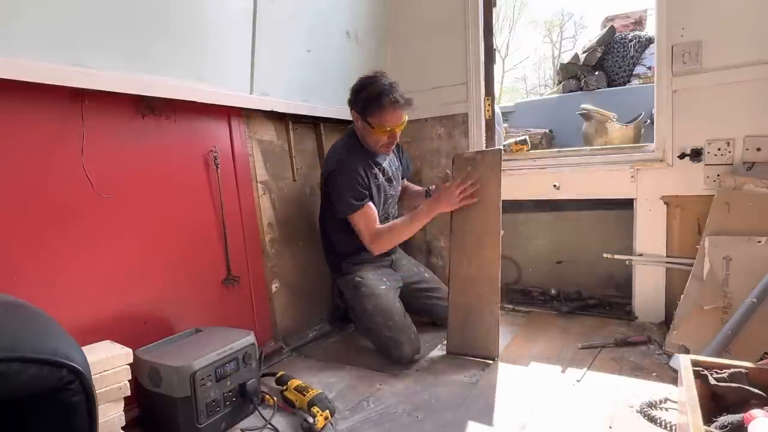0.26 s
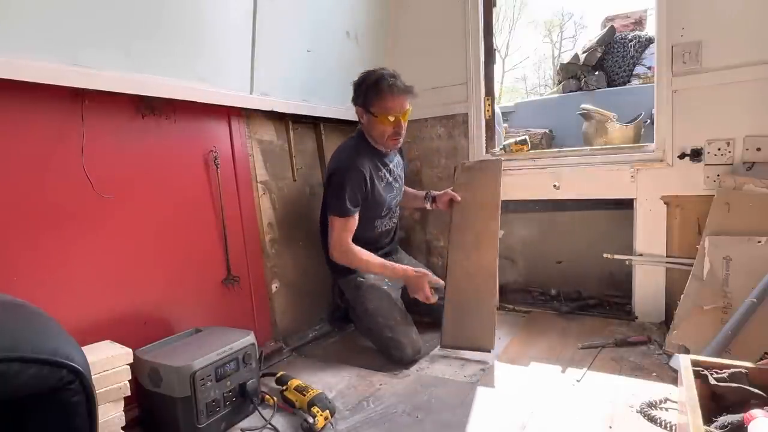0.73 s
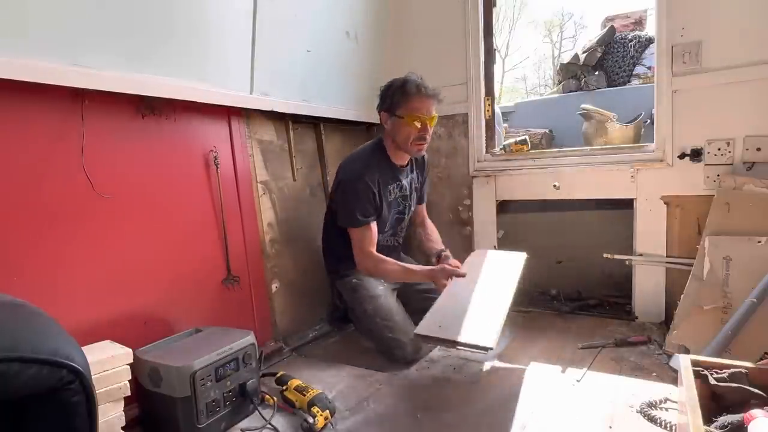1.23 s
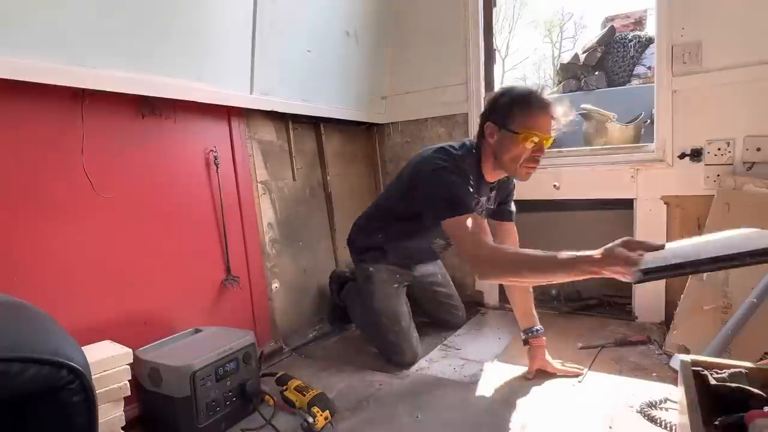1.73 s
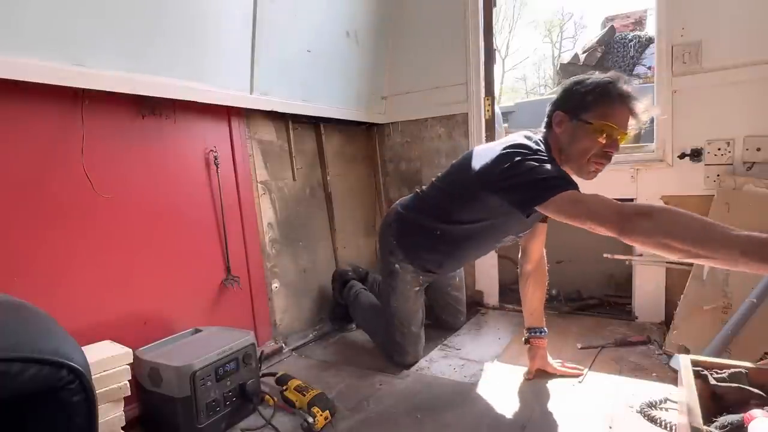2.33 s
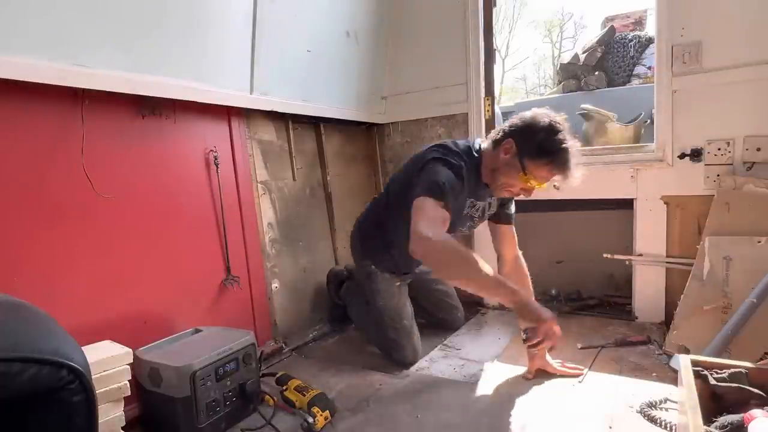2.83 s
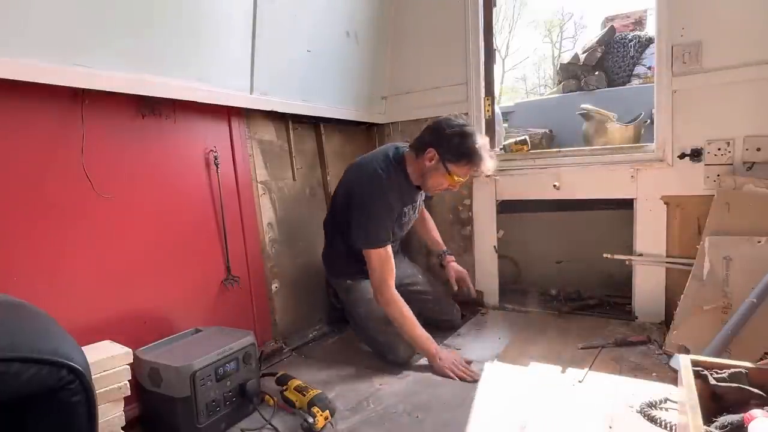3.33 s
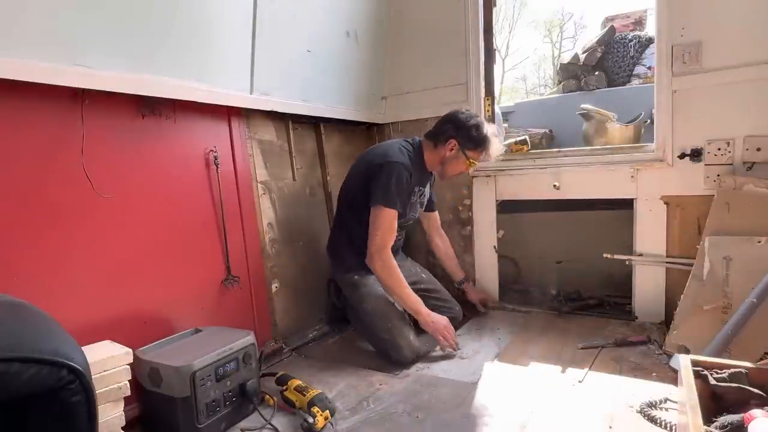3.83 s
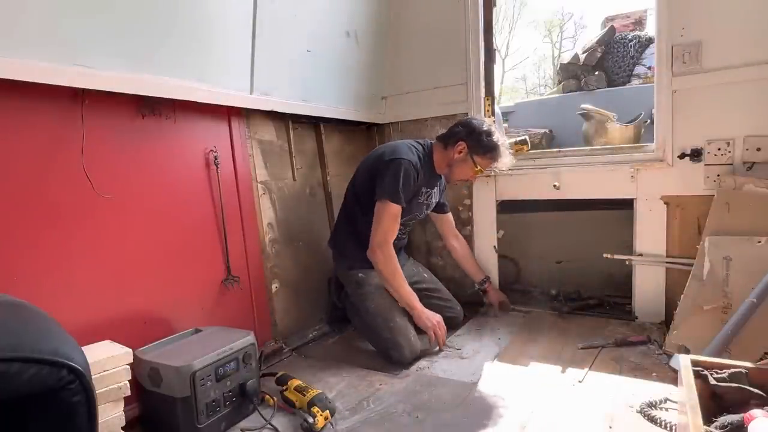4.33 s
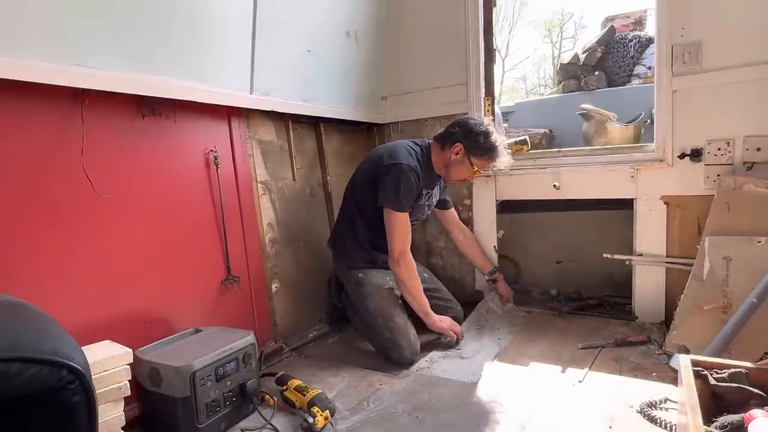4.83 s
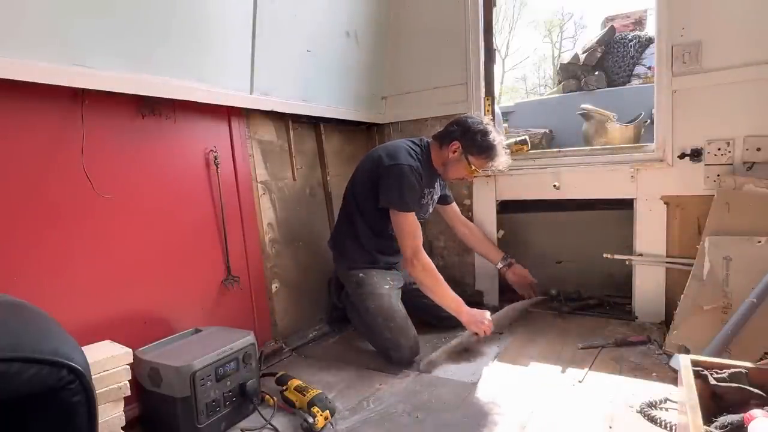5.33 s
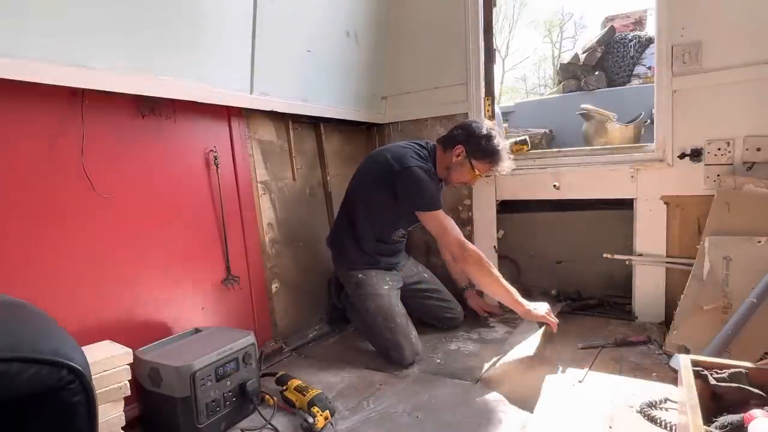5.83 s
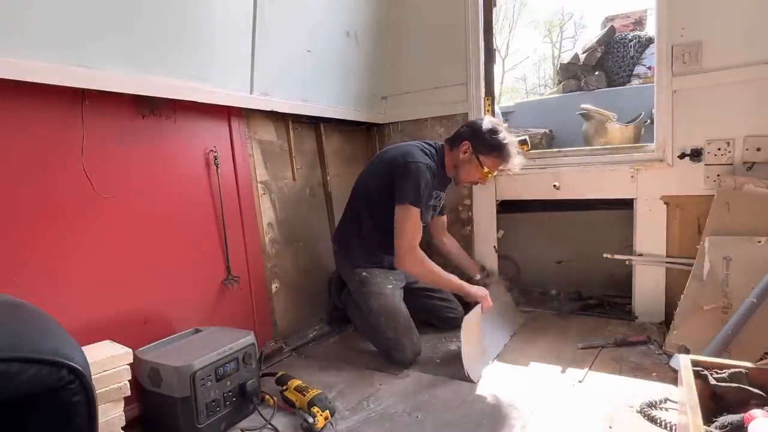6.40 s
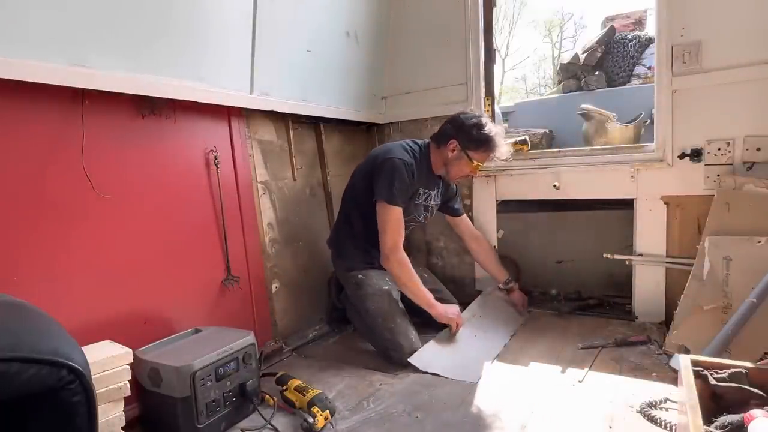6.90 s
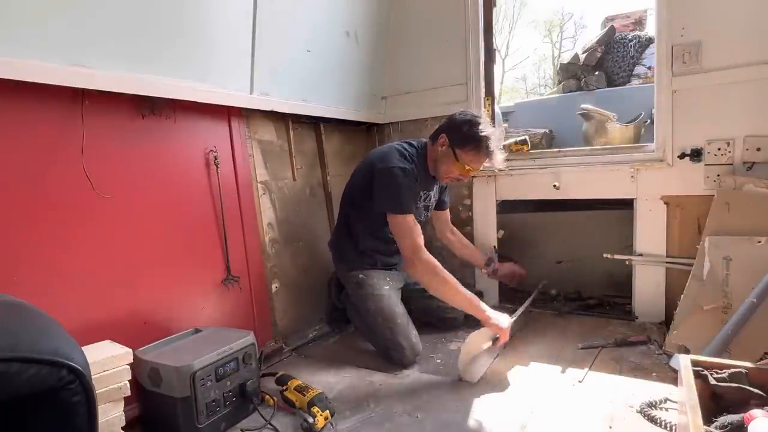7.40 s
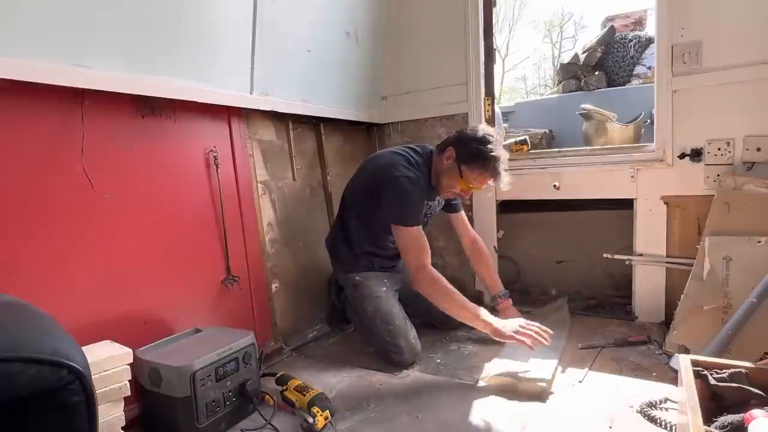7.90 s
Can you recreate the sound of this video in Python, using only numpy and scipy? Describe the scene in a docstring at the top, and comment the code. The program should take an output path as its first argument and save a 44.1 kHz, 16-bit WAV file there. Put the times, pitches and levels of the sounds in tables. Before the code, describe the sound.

Hollow floor thuds, dense wooden clacks and a dusty palm swish, followed by crackling snaps, hoarse scraping and hollow gliding notes from a flexing sheet.

```python
"""A wooden floorboard is lifted, thuds on end and clatters onto a stack in a small boat cabin: each blow
is a click with a dense wood spectrum, plus the board's dying tones and a boom of the hollow floor.
A man's palm sweeps dust, his hands rustle and the board scrapes (shaped noise); then a thin stiff sheet
is peeled up, flipped and dragged over grit: snaps, gliding hollow notes, scraping and hiss.
A low hum goes on, with a boom swelling in it near 6.5 s."""
import sys
import numpy as np
from scipy import signal
from scipy.fft import rfft, irfft
from scipy.io import wavfile

SR = 44100
rng = np.random.default_rng(int(sys.argv[2]) if len(sys.argv) > 2 else 0)


def unload_audio(sound):
    """Save the sound as a 16-bit wav file, at the path given as the first command line argument."""
    columns = np.transpose(np.atleast_2d(sound))
    # keep every value between -1 and 1, then stretch to whole-number steps
    steps = np.round(np.clip(columns, -1, 1) * 32767)
    wavfile.write(sys.argv[1], SR, steps.astype(np.int16))


N = 359415
TIME, HZ = np.arange(N) / SR, np.fft.rfftfreq(N, 1 / SR)
# time and frequency axes of one short blow
RING = np.arange(20480) / SR
RING_HZ = np.fft.rfftfreq(len(RING), 1 / SR)

# how strongly the thin sheet sounds at each pitch: (frequency [Hz], density [dB per Hz])
SHEET_SPECTRUM = [(120, -25), (210, -11.5), (445, -4.5), (513, -7), (802, -1), (1370, 1), (1610, 0),
                  (2560, -3.5), (3120, -6.5), (9260, -16), (10100, -19.5), (13700, -18.5), (15000, -64)]


def gain_of(db):
    """Turns decibels into an amplitude."""
    return 10 ** (np.asarray(db) / 20)


def evened(x):
    """Scales a signal to an rms of one."""
    return x / np.sqrt(np.mean(x ** 2) + 1e-20)


def read(points, hz):
    """Reads a table joined by straight lines over log frequency."""
    f, value = np.transpose(points)
    return np.interp(np.log(hz + 1), np.log(f + 1), value)


def add(mix, s, sound):
    """Mixes a sound in at time s, cutting it at the end of the mix."""
    part = mix[..., max(round(s * SR), 0):][..., :sound.shape[-1]]
    part += sound[..., :part.shape[-1]]


def coloured(x, db):
    """Gives a full-length signal a spectrum and an rms of one."""
    return evened(irfft(rfft(x) * gain_of(db), N))


def tilted(points, tilt_db, pivot_hz):
    """Leans a spectrum by some dB per octave: harder contacts are brighter."""
    octaves = np.log2(np.maximum(RING_HZ, 150) / pivot_hz)
    return read(points, RING_HZ) + tilt_db * octaves


def click(db):
    """Makes a causal click with the given spectrum, its energy that of 50 ms at rms one."""
    log_gain = np.log(gain_of(np.maximum(db - db.max(), -100)))
    circle = np.concatenate([log_gain, log_gain[-2:0:-1]])
    # the Hilbert transform supplies the phase that puts the energy as early as possible
    spectrum = np.exp(np.conj(signal.hilbert(circle)))[:len(db)]
    pulse = irfft(spectrum)
    return pulse / np.linalg.norm(pulse) * np.sqrt(SR / 20)


def dispersed(pulse, dispersion):
    """Bending waves run faster in the treble, so a blow falls in pitch: delay = dispersion / sqrt(Hz)."""
    return irfft(rfft(pulse) * np.exp(-4j * np.pi * dispersion * np.sqrt(RING_HZ)))


def modes(hz, db, t60, rise):
    """Dying sines that build up as the blow spreads; each reaches the far side with its own phase."""
    levels = gain_of(db[:, None] - 60 * RING / t60[:, None])
    waves = levels * np.exp(2j * np.pi * hz[:, None] * RING)
    index = np.arange(len(hz))
    signs = np.array([(-1.) ** index, (-1.) ** (index // 2)])
    build_up = 1 - np.exp(-RING / rise)
    return np.array([signs[0] @ waves.imag, signs[1] @ waves.real]) * build_up


def in_cabin(pulse, direct_db, build):
    """Rows: the direct sound and two diffuse tails that build up between the close walls."""
    # how long the cabin rings: (frequency [Hz], time to fall by 60 dB [s])
    cabin_decay = [(80, 0.86), (250, 0.2), (1000, 0.34), (3000, 0.22), (8000, 0.29), (15000, .22)]
    hz, t, z = signal.stft(rng.standard_normal((2, len(RING))), SR, nperseg=256)
    decay = gain_of(-60 * t / read(cabin_decay, hz)[:, None])
    tail = signal.istft(z * decay, SR, nperseg=256)[1][:, :len(RING)]
    tail = tail * (1 - np.exp(-RING / build))
    tail = signal.fftconvolve(tail, pulse[None], axes=1)[:, :len(RING)]
    # each tail carries the energy of the pulse
    tail *= np.linalg.norm(pulse) / np.linalg.norm(tail, axis=1, keepdims=True)
    return np.vstack([gain_of(direct_db) * pulse, tail])


def friction(grains_per_s, spread_db, grain_db, judder_db):
    """Fine rubbing noise with separate grains catching in it, under an unsteady pressure."""
    sizes = gain_of(spread_db * np.minimum(rng.exponential(1, N), 4))
    grains = evened(sizes * (rng.random(N) < grains_per_s / SR))
    echoes = rng.standard_normal((2, len(RING))) * np.exp(-RING / 0.038)
    echoes[:, 0] = 6  # each grain is heard first directly, then off the walls
    grains = evened(signal.fftconvolve(grains[None], echoes, axes=1)[:, :N])
    slow_db = -20 * np.log10(1 + (HZ / 45) ** 2) - 20 * (HZ < 10)
    pressure = coloured(rng.standard_normal(N), slow_db)
    rubbing = rng.standard_normal((2, N)) + gain_of(grain_db) * grains
    return rubbing * gain_of(judder_db * pressure)


def gesture(start, attack, hold, sag_db, release_db_per_s):
    """The gain of one rubbing move: it rises, loses sag_db while held (gains if negative), then dies away."""
    t = TIME - start
    held = np.clip((t - attack) / hold, 0, 1)
    released = np.maximum(t - attack - hold, 0)
    rise = np.clip(t / attack, 0, 1) ** 0.91
    return rise * gain_of(sag_db * (.5 - held) - release_db_per_s * released)


def off_panels(x, strength, reach, count=10):
    """Early echoes from the nearby panels comb a fine ripple into the rubbing."""
    delays = rng.uniform(.001, reach, count)  # s
    sizes = strength * rng.choice([-1., 1.], count) / np.sqrt(count)
    taps = np.zeros(len(RING))
    taps[0] = 1
    taps[(delays * SR).astype(int)] = sizes
    return signal.oaconvolve(x, taps[None] / np.linalg.norm(taps), axes=1)[:, :N]


def boom(soft_hz):
    """The hollow floor's tones; a soft push reaches only the lowest."""
    # the floor's modes: (frequency [Hz], level before the push softens it [dB], time to fall by 60 dB [s])
    floor_modes = [(45.3, -16, 0.19), (54.6, -14, 0.71), (93.47, 0, 0.42), (116.4, -0.5, 0.18),
                   (142, -16, 0.43), (161.5, -6, 0.23), (336, -17, 0.216)]
    push = signal.butter(2, min(soft_hz, SR / 4), fs=SR)
    return signal.lfilter(*push, modes(*np.transpose(floor_modes), rise=0.0057))


def wood(edge):
    """The clack's spectrum between a flat landing (0) and one on the edge (1)."""
    # dense upper modes of wood on wood:
    # (frequency [Hz], struck on the face [dB per Hz], struck on the edge [dB per Hz])
    clack_spectra = [(50, -34.5, -19), (148, -2, 1.5), (292, 0.5, 3.5), (450, -4, -3.5), (800, -6.5, -1),
                     (980, -14.5, -1.5), (1500, -11, -11.5), (1860, -13, -16), (2170, -18.5, -26),
                     (2900, -18.5, -15), (3920, -30, -21), (4950, -32, -29.5), (8800, -47.5, -42.5),
                     (15500, -71, -63)]
    hz, face_db, edge_db = np.transpose(clack_spectra)
    return np.column_stack([hz, face_db + np.clip(edge, 0, 1) * (edge_db - face_db)])


def background(waver_hz=.6, hum_db=-1):
    """Rumble and faint outdoor hiss as shaped noise, with a low sine hum whose pitch climbs and wavers."""
    # loudness of the low hum, with a boom swelling in it near 6.5 s; hum_db is added to it:
    # (time [s], rms level [dB])
    hum_levels = [(2.8, -57), (4.26, -55), (4.3, -51.5), (6.44, -58), (6.54, -42.5), (7.36, -53.5),
                  (7.67, -48), (8.15, -53)]
    # rumble and hiss: (frequency [Hz], density [dB per Hz])
    air_spectrum = [(15, -69), (25, -10), (101, -3), (158, -20), (243, -20), (293, -18), (501, -22.5),
                    (637, -20.5), (978, -16.5), (1180, -19.5), (1280, -20), (2560, -34.5), (11500, -43),
                    (13800, -46), (15000, -72)]
    air_db = -54.5
    # the hum, perhaps a distant engine, slowly climbs and levels off
    first_hz, last_hz, climb_at_s, climb_hz_per_s = 48.8, 61, 3.6, 3.4
    s, db = np.transpose(hum_levels)
    hz = np.clip(first_hz + climb_hz_per_s * (TIME - climb_at_s), first_hz, last_hz)
    drift = coloured(rng.standard_normal(N), -40 * np.log10(1 + (HZ / 2) ** 2))
    phase = 2 * np.pi * np.cumsum(hz + waver_hz * drift) / SR
    hum = gain_of(hum_db + np.interp(TIME, s, db)) * np.sqrt(2) * np.sin(phase)
    air = gain_of(air_db) * coloured(rng.standard_normal((2, N)), read(air_spectrum, HZ))
    return np.vstack([hum, air])


def handling():
    """Fingers shift, clothes rustle and the board scrapes along the stack: grainy noise in short moves."""
    # each rub, before the common trim: (start [s], attack [s], hold [s], level [dB])
    rubs = [(0.0, 0.0017, 0.016, -42), (0.081, .015, 0.017, -49.5), (0.232, 0.018, .015, -56.5),
            (0.327, .025, .04, -55.5), (0.6, 0.054, .03, -60), (0.78, 0.017, 0.025, -63.5),
            (1.137, 0.072, 0.0059, -47.5), (1.48, 0.044, .06, -67.5), (1.59, 0.024, 0.098, -56.5),
            (1.95, 0.034, 0.037, -64.5), (2.07, .01, 0.23, -56.5), (2.251, 0.017, 0.31, -50),
            (2.408, 0.023, 0.024, -52), (2.713, 0.094, .24, -58)]
    # colour of the rubbing: (frequency [Hz], density [dB per Hz])
    grip_spectrum = [(290, -23), (500, -21), (777, -7), (909, -3.5), (1020, 1.5), (1230, -6.5), (2880, -9),
                     (8490, -17), (13800, -26.5), (15000, -52)]
    sag_db, release_db_per_s, trim_db = 2.5, 118, 3.0
    rub = friction(grains_per_s=200, spread_db=6.5, grain_db=-13, judder_db=1.5)
    moves = sum(gain_of(db) * gesture(s, attack, hold, sag_db, release_db_per_s)
                for s, attack, hold, db in rubs)
    return gain_of(trim_db) * moves * coloured(rub, read(grip_spectrum, HZ))


def sweep(start, to_peak, width):
    """The gain of one palm stroke: the hand touches down and its speed follows a bell."""
    touch_s, speed_power = 0.0038, 1.82  # the swish grows as this power of the hand's speed
    t = TIME - start
    speed = 1 / (1 + ((t - to_peak) / width) ** 2)
    return np.clip(t / touch_s, 0, 1) * speed ** speed_power


def palm_strokes():
    """Skin sweeps fine dust along the wood: dense tiny grains make a smooth bright swish."""
    # each stroke, before the common trim:
    # (touch-down [s], time to full speed [s], half-width of the speed bell [s], level [dB])
    palm_sweeps = [(0.386, 0.12, .088, -36), (3.292, .19, 0.086, -26.5)]
    # colour of the swish: (frequency [Hz], density [dB per Hz])
    palm_spectrum = [(180, -37), (300, -22), (577, -16), (647, -14.5), (2360, -3.5), (8320, -1),
                     (9960, -12), (10800, -6), (13600, -8.5), (14300, -30), (15000, -56)]
    trim_db = 2.5
    rub = friction(grains_per_s=1000, spread_db=3, grain_db=-18, judder_db=.5)
    strokes = sum(gain_of(db) * sweep(s, to_peak, width) for s, to_peak, width, db in palm_sweeps)
    return gain_of(trim_db) * strokes * coloured(rub, read(palm_spectrum, HZ))


def resonate(x, hz, width):
    """A resonance of gain one that follows the curve hz."""
    # shift the moving pitch down to zero, smooth there, and shift back
    turn = np.exp(2j * np.pi * np.cumsum(hz) / SR)
    r = np.exp(-np.pi * width / SR)
    return 2 * (turn * signal.lfilter([1 - r], [1, -r], x / turn)).real


def sheet_bends(width_hz=290, upper=1.414, upper_db=-4):
    """Rubbing excites two resonances of the bowed sheet, which slide as its curve changes."""
    # each hollow note, before the common trim:
    # (start [s], attack [s], hold [s], level [dB], first pitch [Hz], last pitch [Hz])
    bends = [(4.264, .02, 0.026, -51, 450, 200), (4.363, 0.018, 0.03, -56, 330, 330),
             (4.928, .08, 0.23, -46.5, 654, 610), (5.359, 0.016, 0.27, -45, 1280, 1050),
             (5.732, 0.033, 0.074, -36.5, 1210, 1220), (6.695, 0.31, .17, -47.5, 650, 810),
             (7.192, 0.016, 0.071, -46.5, 730, 573)]
    sag_db, release_db_per_s, trim_db = -2.5, 200, 1.5
    rub = friction(grains_per_s=120, spread_db=6.0, grain_db=0.0, judder_db=2.5)
    note, bowing = np.zeros(N), np.zeros(N)
    for s, attack, hold, db, first_hz, last_hz in bends:
        progress = np.clip((TIME - s) / (attack + hold), 0, 1)
        glide = first_hz * (last_hz / first_hz) ** progress
        note = np.where((TIME >= s) | (note == 0), glide, note)
        bowing += gain_of(db) * gesture(s, attack, hold, sag_db, release_db_per_s)
    # two passes make each resonance steeper
    low, high = (evened(resonate(resonate(rub, f, width_hz), f, width_hz))
                 for f in (note, upper * note))
    return gain_of(trim_db) * bowing * (low + gain_of(upper_db) * high)


def sheet_slide(drum_hz=800, grit_hz=3500):
    """The dragged edge scrapes; the sheet drums lower down and shakes the floor; loose grit hisses above."""
    # each pull, before the trims:
    # (start [s], attack [s], hold [s], scrape [dB], drumming of the sheet [dB], hiss of grit [dB])
    drags = [(3.952, .11, 0.19, -52, -54, -49), (4.321, 0.042, 0.31, -54, -67, -52.5),
             (4.66, 0.023, 0.032, -49, -57, -47), (4.757, .1, 0.022, -50, -51.5, -48),
             (4.942, .06, 0.12, -45.5, -49, -48.5), (5.102, 0.056, 0.13, -45, -45, -49.5),
             (5.326, 0.028, .02, -51, -53, -51.5), (5.384, .008, 0.036, -32.5, -32.5, -35.5),
             (5.43, .11, 0.21, -31, -37.5, -33), (5.731, .025, 0.043, -30, -43, -37.5),
             (5.926, 0.35, .06, -54, -63, -52.5), (6.309, 0.038, 0.32, -49, -48, -50.5),
             (6.684, 0.35, .27, -40.5, -47, -44.5), (7.328, .03, .17, -56.5, -61.5, -52),
             (7.527, 0.015, 0.021, -41.5, -48, -46), (7.634, 0.11, .03, -48.5, -57, -52.5),
             (7.752, 0.056, 0.047, -39, -50.5, -41), (7.904, 0.046, 0.027, -55, -68.5, -54),
             (8.04, .09, 0.032, -48.5, -61, -46.5)]
    sag_db, release_db_per_s = 0, 156
    trims_db = [-2, -2, -.5]  # scrape, drumming, hiss
    # the hardest pull shakes the hollow floor, light ones hardly do
    boom_db, boom_soft_hz, boom_power = -35.5, 170, 1.16

    rub = friction(grains_per_s=200, spread_db=4, grain_db=-3, judder_db=1.0)
    drums = 1 / (1 + (HZ / drum_hz) ** 4)
    hisses = 1 - 1 / (1 + (HZ / grit_hz) ** 4)
    shares = (1 - drums) * (1 - hisses), drums, hisses
    pulls = np.array([gesture(*row[:3], sag_db, release_db_per_s) for row in drags])
    # overlapping pulls add by power
    gains = np.sqrt(gain_of(np.array(drags)[:, 3:].T) ** 2 @ pulls ** 2)
    shake = evened(signal.oaconvolve(rub, boom(boom_soft_hz), axes=1)[:, :N])
    force = gains[1] / gains[1].max()
    out = gain_of(boom_db) * force ** boom_power * shake
    for trim_db, gain, share in zip(trims_db, gains, shares):
        band_db = read(SHEET_SPECTRUM, HZ) + 20 * np.log10(share + 1e-9)
        out = out + gain_of(trim_db) * gain * coloured(rub, band_db)
    return out


def sheet_snaps():
    """The thin sheet is touched, buckles, snaps and slaps with a short falling chirp."""
    # each snap: (time [s], level [dB], brightness [dB per octave])
    snaps = [(4.141, -44, 3.5), (4.272, -60.5, -16), (4.292, -36, -28), (4.542, -49, 4),
             (4.677, -35.5, -0.2), (5.03, -50, 3), (5.386, -32.5, -1), (5.411, -26, -1.5),
             (5.524, -30.5, -0.5), (5.598, -35, 6), (5.748, -27.5, 1), (5.812, -39.5, 2), (6.35, -44.5, -1),
             (6.464, -47, 4), (7.534, -44, 8), (7.803, -43, -0.5)]
    out = np.zeros((3, N))
    for s, snap_db, tilt_db in snaps:
        snap = dispersed(click(tilted(SHEET_SPECTRUM, tilt_db, pivot_hz=1000)), dispersion=.1)
        add(out, s, gain_of(snap_db) * in_cabin(snap, direct_db=-11.5, build=0.00032))
    return out


def floor_thuds():
    """Soft blows of the board's end, hands, knees and the moving sheet: a floor boom under a dull slap."""
    # each blow: (time [s], boom [dB], softness as the highest frequency of the push [Hz], slap [dB])
    thuds = [(0.001, -31, 400, -31), (0.009, -7.5, 248, -29.5), (0.092, -20, 200, -66),
             (0.212, -33.5, 117, -82), (0.41, -38, 100, -64), (0.524, -31, 220, -49),
             (0.595, -29, 107, -78), (1.668, -7.5, 50, -54), (1.692, -15.5, 60, -50),
             (1.727, -21.5, 55.3, -51), (1.805, -19, 34, -63), (3.328, -34, 131, -60),
             (4.335, -26, 50, -60), (4.385, -47, 250, -52.5), (6.5, -17, 22, -59), (7.544, -34, 130, -49.5),
             (7.795, -39, 110, -59), (8.139, -34, 180, -58)]
    out = np.zeros((3, N))
    slap = click(tilted(wood(edge=0), tilt_db=-4.5, pivot_hz=500))
    for s, boom_db, soft_hz, slap_db in thuds:
        add(out[1:], s, gain_of(boom_db) * boom(soft_hz))
        add(out, s, gain_of(slap_db) * in_cabin(slap, direct_db=0.0, build=0.0015))
    return out


def board_knocks():
    """Each tap or landing clacks, rings the board by where it is struck, and shakes the floor."""
    # each contact: (time [s], clack [dB], brightness [dB per octave], ring [dB],
    # where it strikes [0 face to 1 edge], floor boom [dB])
    knocks = [(0.003, -32.5, -0.5, -33, 0.3, -48), (0.522, -41, 7, -36, 0.14, -62),
              (1.187, -49.5, 9.5, -55, 0.67, -64), (1.579, -51, -1, -63, 0.82, -59),
              (1.605, -50, 0.5, -52, 0.46, -40), (2.076, -37, 0, -25.5, 0.045, -31.5),
              (2.13, -45.5, 3.5, -57, 0.44, -44), (2.144, -36, -7.5, -34, 0.087, -52),
              (2.272, -16, -0.5, -14, 0.051, -25), (2.289, -20, -2, -30, 0.3, -48),
              (2.325, -30.5, 2, -40, 0.47, -52), (2.331, -29, -1.5, -13, 0.16, -20.5),
              (2.486, -23.5, 3.5, -24.5, 0.81, -23.5), (2.491, -23, -1.5, -14, 0.8, -14.5),
              (2.535, -32, 0.9, -25.5, 0.93, -27.5), (2.744, -48.5, -3, -44, 0.55, -54),
              (2.844, -57, 2, -65, 0.43, -68), (2.937, -53, 1.5, -65, 0.017, -70)]
    # the board's modes:
    # (frequency [Hz], struck on the face [dB], struck on the edge [dB], time to fall by 60 dB [s])
    board_modes = [(177.2, 6, -12, 0.16), (209.5, -3, 4.5, 0.11), (332.3, -12, -0.5, 0.24),
                   (401, -6, -38, 0.12), (437, -9, -16, 0.27), (489.5, -19.5, 5.5, 0.14),
                   (538, -28.5, -9, .27), (590, -37, -31, 0.32), (670, -30, -24, 0.2),
                   (745, -28, -13, 0.27), (895, -50, -12.5, .3), (1125, -24, 4, 0.3), (1230, -42, -24, .28),
                   (1280, -27, -38, 0.41), (1340, -43, -10, 0.23), (1560, -18, -28, .25),
                   (1800, -17, -10.5, 0.093), (1910, -28.5, -35, 0.63), (2070, -37, -41, 0.2),
                   (2270, -32, -46, 0.52), (2700, -36, -19, 0.32), (2885, -27.5, -28, 0.29),
                   (3145, -27, -16, 0.22)]
    out = np.zeros((3, N))
    shake = boom(soft_hz=220)
    hz, face_db, edge_db, t60 = np.transpose(board_modes)
    for s, clack_db, tilt_db, ring_db, edge, floor_db in knocks:
        clack = dispersed(click(tilted(wood(edge), tilt_db, pivot_hz=500)), dispersion=0.06896)
        add(out, s, gain_of(clack_db) * in_cabin(clack, direct_db=-6.5, build=0.0011))
        struck_db = face_db + np.clip(edge, 0, 1) * (edge_db - face_db)
        struck_db = struck_db + tilt_db * np.log2(hz / 500)
        ring = gain_of(ring_db) * modes(hz, struck_db, t60, rise=0.0013)
        add(out[1:], s, ring + gain_of(floor_db) * shake)
    return out


def microphones(sound, lag=0.00044):
    """The work is off to the right: the left hears it later, and the diffuse treble differs by side."""
    # likeness of the diffuse sound at both sides: (frequency [Hz], left-right likeness [0 to 1])
    likeness = [(60, 0.99), (125, 0.95), (250, 0.94), (500, 0.91), (1000, 0.12), (2000, 0.063),
                (4000, 0.042), (12000, 0.099)]
    # balance between the sides: (frequency [Hz], left minus right [dB])
    balance = [(60, -2), (125, -3), (250, 2), (500, -4.5), (1000, -1.5), (4000, -3.5), (8000, -1.5),
               (15000, 1.5)]
    direct, shared, other = rfft(sound)
    same = np.clip(read(likeness, HZ), -1, 1)
    late = np.exp(-2j * np.pi * HZ * lag)
    left = late * (direct + same * shared) + np.sqrt(1 - same ** 2) * other
    lean = gain_of(read(balance, HZ) / 2)
    return irfft(np.array([left * lean, (direct + shared) / lean]), N)


def scene():
    """Row 0 is direct sound, rows 1 and 2 diffuse; the rubbing is all diffuse."""
    sound = background() + sheet_snaps() + floor_thuds() + board_knocks()
    rubbing = handling() + palm_strokes() + sheet_bends() + sheet_slide()
    sound[1:] += off_panels(rubbing, strength=0.41, reach=.012)
    return microphones(sound)


def record(dry):
    """The recorder's band limit: a low-pass filter takes away the highest treble."""
    edge_hz = 15700
    low_pass = signal.firwin(511, edge_hz, window=("kaiser", 9), fs=SR)
    return signal.oaconvolve(dry, low_pass[None], "same")


dry = scene()
out = record(dry)
unload_audio(out)
```